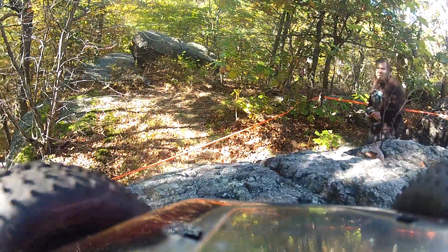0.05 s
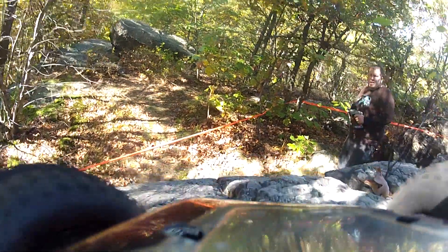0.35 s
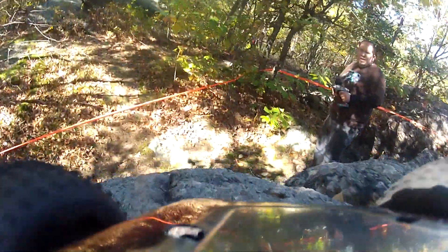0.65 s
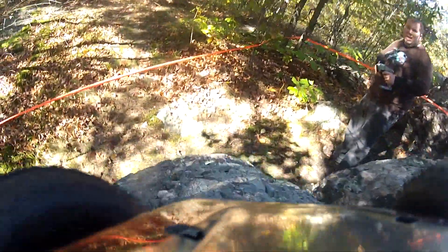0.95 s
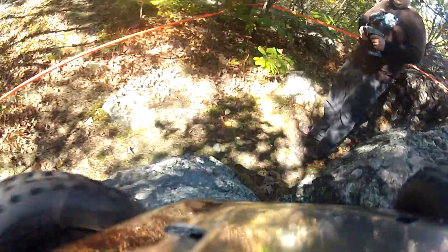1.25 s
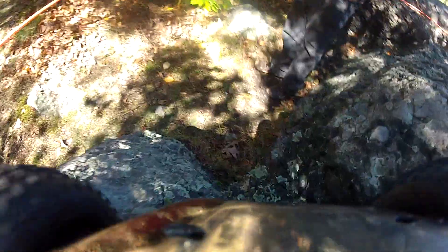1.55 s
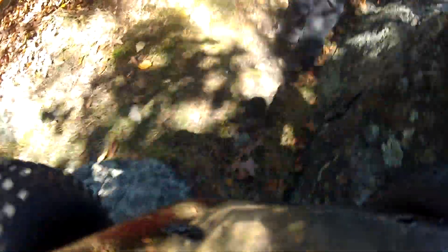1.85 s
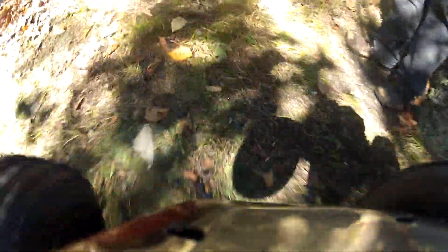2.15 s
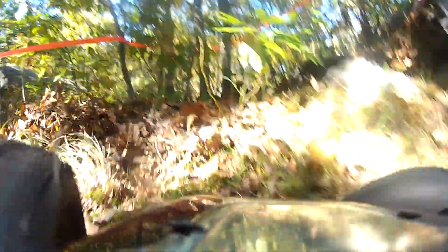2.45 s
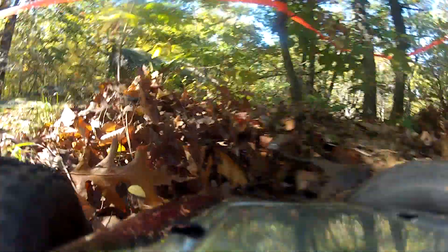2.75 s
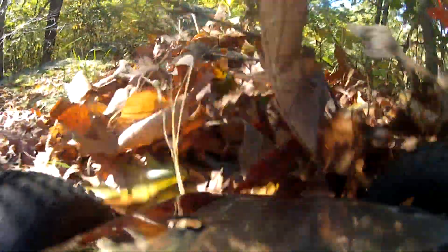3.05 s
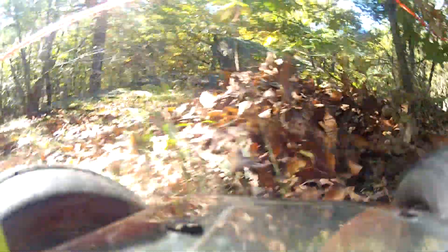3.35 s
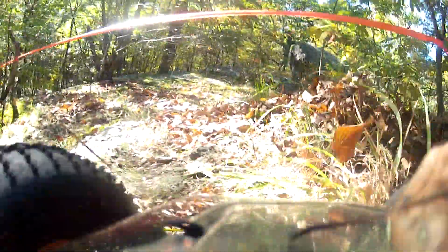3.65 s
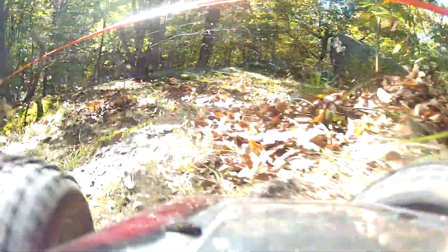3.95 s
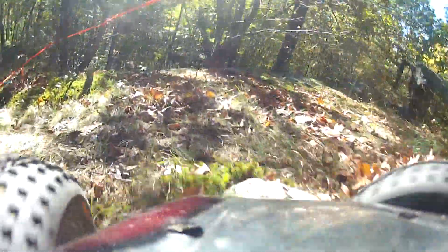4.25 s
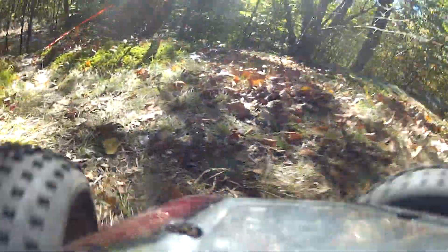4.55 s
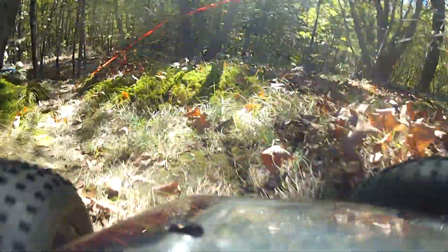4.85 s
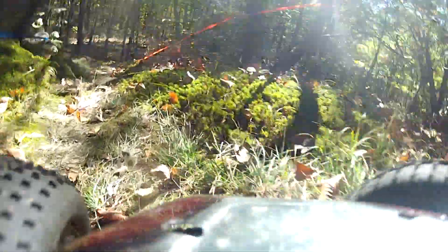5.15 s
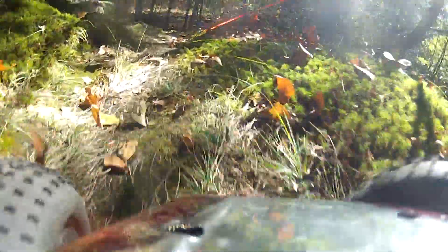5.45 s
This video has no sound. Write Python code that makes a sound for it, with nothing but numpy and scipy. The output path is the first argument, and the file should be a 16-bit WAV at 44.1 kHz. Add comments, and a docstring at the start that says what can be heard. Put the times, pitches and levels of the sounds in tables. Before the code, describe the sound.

A remote-controlled truck crawls down a rock, its small electric motor whining and chugging while the gears rattle, tyres rumble and the shell knocks. Midway the motor races as the truck thumps onto the forest floor, crackling through dry leaves. It nearly stalls twice, with faint steering squeals and gear clatter, then chugs on over bumps. The microphone rides on the chassis, close, dry and gritty.

```python
"""A radio-controlled truck, heard from its own chassis, crawls down a rock: the motor pinion whines against
the spur gear, which binds about once a turn and chugs; loose teeth rattle, tyres rumble, the shell knocks.
Near 2.4 s it drops onto the forest floor with a thump and a crackle of dry leaves, the motor racing.
Near 3.0 s and 3.7 s it slows, the steering servo squeals and the gears clatter as it pushes on, chugging.
Throughout, the small camera holds each value it samples at 12 kHz, mirroring the whine into the treble."""
import sys
import numpy as np
from scipy import signal
from scipy.fft import rfft, irfft
from scipy.io import wavfile
from scipy.ndimage import uniform_filter1d

SR = 44100
rng = np.random.default_rng(int(sys.argv[2]) if len(sys.argv) > 2 else 0)


def persist_wave(psi):
    """Save psi, clipped to +-1, as 16-bit WAV."""
    counts = np.round(np.clip(psi, -1, 1) * 32767).astype(np.int16)
    wavfile.write(sys.argv[1], SR, np.atleast_2d(counts).T)


N = 246954
TIME = np.arange(N) / SR

# pitch of the whine, the rate at which pinion and spur teeth meet: t/s, f/Hz
TOOTH_RATE = [(0.0, 446), (0.031, 493), (0.069, 310), (0.156, 632), (0.23, 1019), (0.265, 1000.0),
              (0.324, 1354), (0.39, 1415), (0.46, 1223), (0.5, 1402), (0.746, 1468), (0.82, 1642),
              (0.896, 1627), (0.96, 1853), (1.05, 1842), (1.254, 1388), (1.68, 1445), (1.774, 1923),
              (1.88, 2063), (1.976, 1912), (2.05, 1250.0), (2.2, 2451), (2.23, 3246), (2.344, 4103),
              (2.464, 3648), (2.51, 4160), (2.57, 3840), (2.61, 3051), (2.65, 3708), (2.734, 3240),
              (2.76, 2693), (2.885, 2030), (2.954, 1814), (3.014, 671.5), (3.1, 727.5), (3.12, 1022),
              (3.15, 992), (3.27, 1531), (3.315, 1570), (3.37, 1820.0), (3.45, 1682), (3.55, 1859),
              (3.64, 1617), (3.726, 388.0), (3.785, 389.7), (3.81, 711), (3.84, 694.6), (3.895, 1836),
              (3.925, 1523), (4.01, 2282), (4.11, 2268), (4.26, 2022), (4.5, 1987), (4.65, 1836),
              (4.74, 1907), (4.79, 2307), (4.9, 2026), (5.03, 1811), (5.14, 1903), (5.2, 1594), (5.3, 1835),
              (5.4, 1534), (5.49, 1605), (5.6, 1954)]
# steady load on the gears: t/s, whine level/dB, rattle level/dB
GEAR_LOAD = [(0, -22.5, -18), (.075, -24.5, -22), (.12, -17, -21.5), (.28, -14.5, -29), (.39, -47, -26.5),
             (.58, -30.5, -26.5), (.65, -31, -20.5), (1.04, -32, -28.5), (1.12, -31, -21.5),
             (1.25, -51, -21), (1.68, -26.5, -19), (1.8, -25.5, -30), (1.91, -42, -19.5),
             (2.05, -26.5, -29.5), (2.35, -54, -16), (2.48, -59, -28.5), (2.6, -62, -21.5),
             (2.73, -19, -24), (2.78, -40, -23.5), (3.06, -41, -32.5), (3.09, -17, -25.5), (3.55, -22, -25),
             (3.64, -17.5, -26), (3.7, -45, -33.5), (3.79, -31.5, -22.5), (3.95, -23, -29),
             (4.09, -26.5, -22.5), (4.15, -35, -30.5), (4.25, -39, -20.5), (4.45, -36, -22.5),
             (4.9, -34, -25), (5.6, -27.5, -27)]
# hard pulling sharpens the tooth contact: t/s, overtone slope/(dB per octave)
TOOTH_BITE = [(0, -10.5), (.2, -4.5), (.5, -13.5), (.8, -14.5), (1.9, -15), (2.19, -7.5), (2.3, -5),
              (3.1, -13.5), (3.2, -10.5), (3.4, -13), (3.85, -9.5), (5.6, -11.5)]
# how strongly the housing radiates the whine: f/Hz, level/dB
WHINE_EQ = [(300, -31), (470, -7.5), (560, -21), (700, 9), (1050, 8), (1450, 10.5), (1900, 12.5),
            (2500, -4.5), (3100, 10.5), (3400, 1), (3700, 3.5), (4250, -10), (4750, -6.5), (5900, -20)]
# runs of evenly spaced binds: first t/s, last t/s, step/teeth, whine level/dB, rattle level/dB, sag depth
CHUG_RUNS = [(0.689, 0.861, 79, -21.5, -28, 0.013), (0.908, 0.997, 101, -16.5, -26, 0.0085),
             (1.053, 1.218, 74, -21.5, -36.5, 0.017), (1.277, 1.651, 83.5, -19.5, -33.5, .015),
             (1.709, 1.981, 87.7, -19, -51, 0.016), (2.232, 2.682, 170, -34.5, -25, 0.069),
             (2.886, 2.931, 88, -15, -28, .05), (3.387, 3.485, 110, -25.5, -36, 0.019),
             (4.023, 4.099, 85, -49, -34, 0.056), (4.344, 4.723, 96.6, -17.5, -36.5, 0.087),
             (4.991, 5.054, 110, -16, -41, .09), (5.131, 5.176, 74, -15.5, -53, 0.087),
             (5.239, 5.29, 75, -23.5, -36, .02), (5.458, 5.582, 74.5, -20.5, -24, 0.029)]
# single hard binds as a wheel catches: t/s, half length/s, whine level/dB, rattle level/dB
WHEEL_CATCHES = [(.018, .014, -17, -43), (0.351, 0.028, -19.5, -54), (0.432, 0.017, -13.5, -47),
                 (0.512, 0.012, -16.5, -34), (0.739, 0.0094, -49, -27), (2.024, 0.021, -24, -30),
                 (2.097, 0.0095, -15, -58), (2.184, 0.048, -29.5, -25), (2.247, 0.019, -20.5, -43),
                 (2.434, 0.015, -12, -57), (2.596, 0.025, -16, -54), (2.967, 0.011, -41, -24),
                 (3.101, 0.021, -25.5, -49), (3.282, 0.015, -25.5, -45), (3.431, .014, -26.5, -44),
                 (3.6, .024, -25, -27.5), (3.802, 0.0092, -12, -49), (3.838, 0.01, -15, -19),
                 (3.882, 0.016, -13.5, -55), (3.94, 0.0098, -27, -50), (4.227, 0.018, -25, -30),
                 (4.335, 0.013, -22, -19.5), (4.46, 0.018, -27, -34), (4.836, .016, -22, -22),
                 (4.948, 0.02, -23, -19.5), (5.319, 0.012, -17.5, -28), (5.38, .014, -16, -32)]
# the throttle opens from rest and the backlash clatters: t/s, rattle level/dB
THROTTLE_KICKS = [(3.071, -11.5), (3.786, -13)]
# colour of the gearbox and shell when struck: f/Hz, level/dB
BODY_EQ = [(200, -15.5), (450, -14.5), (620, -11.5), (880, -3.5), (1100, 2), (1500, -8), (1850, 0),
           (2350, -11), (2750, -20.5), (3100, -8.5), (3400, -20), (3700, -9.5), (4250, -31), (5900, -32)]
# modes of the gearbox housing that ring on: f/Hz, width/Hz, level/dB
HOUSING_MODES = [(995, 42, -7), (1204, 150, -2), (1550, 30, -16), (1915, 24, -0.5), (2964, 53, 2.5),
                 (3550, 60, 2.5)]
# hoots of the housing: t/s, half length/s, f/Hz, level/dB
HOOT_CUES = [(0.026, .01, 990, -11.5), (0.569, 0.0063, 1060, -14.5), (0.682, 0.011, 1084, -14),
             (0.739, 0.0077, 1090, -9), (1.226, 0.01, 1008, -13), (1.275, 0.0088, 1074, -11.5),
             (2.233, 0.0011, 3260, -1.5), (2.4, 0.0086, 1243, -12.5), (2.658, 0.0061, 980, -14.5),
             (2.679, 0.0072, 1054, -9), (2.718, 0.014, 1065, -14.5), (2.824, 0.01, 1113, -16.5),
             (4.106, 0.0061, 1152, -5.5), (4.514, 0.0081, 1000, -11), (4.848, 0.0029, 1032, -3.5),
             (4.968, 0.0068, 995, -15.5)]
# knocks on the shell and chassis: t/s, peak level/dB, treble lift/dB
KNOCK_CUES = [(0.503, -17.5, 22), (0.604, -19, -8), (.777, -15, -7), (1.041, -37, -6), (1.441, -28, 6),
              (1.461, -17, 11), (1.482, -29, -10), (1.843, -16.5, -9), (1.924, -5, -19), (1.96, -7.5, 6),
              (2.091, -10.5, -10), (2.155, -12, 17), (2.431, -19, 5), (2.493, -10.5, -16),
              (2.559, -4.5, 10), (2.866, -6.5, 2), (3.018, -15, -6), (3.662, -8, -20), (3.682, -15, 6),
              (4.016, -12.5, -21), (4.322, -12, -2), (4.384, -10, -18), (4.834, -7.5, 7), (4.847, -19, 6),
              (4.926, -5, -18), (5.102, -13.5, -21), (5.317, -7, 8.5)]
# rumble of the tyres on the ground: t/s, level/dB
ROLL_FADER = [(0.0, -37), (0.37, -45), (1.39, -30.5), (1.87, -38), (1.9, -26), (2.06, -36.5), (2.17, -23.5),
              (2.21, -30.5), (2.34, -30), (2.37, -17.5), (2.48, -36), (2.59, -23), (2.7, -35),
              (3.07, -29.5), (3.4, -39.5), (3.81, -29), (3.94, -43), (3.99, -31.5), (4.18, -38.5),
              (4.21, -28), (4.66, -37.5), (4.85, -21.5), (4.88, -37), (4.96, -30), (5.02, -41), (5.46, -41),
              (5.6, -26.5)]
# colour of the tyres and suspension: f/Hz, level/dB
TYRE_EQ = [(20, -31), (45, -16.5), (70, -3), (94, 2), (120, -9), (150, -8.5), (200, -15), (330, -25.5),
           (600, -24), (1500, -46.5)]
# the wheels land: t/s, level/dB
LANDINGS = [(0.831, -16), (1.128, -15.5), (1.336, -14), (1.903, -12), (1.925, -12), (2.147, -10),
            (2.351, -22), (2.366, -4), (2.548, -13.5), (3.088, -15), (3.78, -16), (4.218, -15),
            (4.296, -12), (4.835, -10), (4.948, -18)]
# dry leaves under the wheels: t/s, level/dB
LEAF_FADER = [(0, -70), (2.3, -23), (2.5, -27), (2.9, -34), (3.05, -69), (3.7, -59), (4.3, -71), (5.6, -53)]
# colour of a snapping leaf: f/Hz, level/dB
LEAF_EQ = [(300, -18), (620, -2), (1200, 17), (3600, 0), (4500, -76), (6000, -15)]
# steering moves: start t/s, length/s, top f/Hz, level/dB
SERVO_CUES = [(3.028, 0.0744, 4170, -36), (3.734, 0.05, 4420, -41.5)]
# the slower gear stages: multiple of the tooth rate, level/dB
SLOW_STAGES = [(.229, -44), (.4, -45)]
# how the chassis plate carries their hum: f/Hz, level/dB
PLATE_EQ = [(280, -20), (400, -3), (470, 0), (580, 0), (700, -7), (1000, -20)]
# how firmly they press on the plate: t/s, level/dB
PLATE_PRESSURE = [(0, -47), (.5, 0), (1.85, 5), (2.0, -9), (3.2, 3), (3.35, 6.5), (3.65, 4.5), (3.8, -3),
                  (5.6, -2)]

PINION_TEETH = 20


def whine(mesh_hz, teeth, slack, slope_db, rough_db=2.5, runout=0.0069, wobble=0.18):
    """Harmonics of the tooth rate glide through the body's resonances; the pinion wobbles once a turn."""
    orders = np.arange(1, 6)[:, None]
    gains = gain_at(WHINE_EQ, orders * mesh_hz) * from_db(slope_db * np.log2(orders))
    gains /= np.sqrt(np.sum(gains ** 2, axis=0) / 2)
    rotor = np.sin(2 * np.pi * teeth / PINION_TEETH)
    # slack teeth meet early or late, more so at speed, which frays the overtones most
    stray = (.022 + .13 * slack) * np.minimum(mesh_hz / 1700, 1.2) * drift(110)
    cycles = teeth + stray + runout * slack * rotor
    tone = np.sum(gains * np.sin(2 * np.pi * orders * cycles), axis=0)
    return tone * (1 + wobble * rotor) * from_db(rough_db * drift(61))


def rattle(teeth, bright_db, uneven_db=4.0, rotor_db=1.5, limp=0.13):
    """Teeth slap both ways across their backlash, unevenly; at times every second tooth hits harder."""
    contacts = np.flatnonzero(np.diff(np.floor(2 * teeth)) > 0)
    force = (rng.standard_normal(N) * from_db(uneven_db * drift(375)))[:len(contacts)]
    force += limp * drift(37)[contacts] * np.cos(np.pi * teeth[contacts])
    rotor = np.sin(2 * np.pi * teeth[contacts] / PINION_TEETH)
    slaps = np.zeros(N)
    slaps[contacts] = force * from_db(rotor_db * rotor)
    return levelled(brighten(ring_body(slaps), bright_db), seconds=0.019)


def binds(mesh_hz, half_share=0.32, spread_db=2, catch_sag=0.055):
    """Cue list of every bind: they come at steps of the rotation, so faster gears chug faster."""
    teeth = np.cumsum(mesh_hz) / SR
    cues = [(*catch, catch_sag) for catch in WHEEL_CATCHES]
    for first, last, step, whine_db, rattle_db, sag in CHUG_RUNS:
        begin, end = np.interp([first, last], TIME, teeth)
        binding_teeth = np.linspace(begin, end, round((end - begin) / step) + 1)
        times = np.interp(binding_teeth, teeth, TIME)
        for s, chance_db in zip(times, spread_db * rng.standard_normal((32, 2))):
            half = half_share * step / np.interp(s, TIME, mesh_hz)
            cues.append((s, half, whine_db + chance_db[0], rattle_db + chance_db[1], sag))
    return cues


def gear_load(mesh_hz, build=1.42, release=0.8, drag=1.6, dulling=0.058):
    """Envelopes for the gears: the steady load plus a swell that builds at each bind and lets go."""
    whine_db, rattle_db = in_time(GEAR_LOAD)
    bite_db, = in_time(TOOTH_BITE)
    whine_gain, rattle_gain = from_db(whine_db), from_db(rattle_db)
    speed, duck_db = np.ones(N), np.zeros(N)
    # the rattle brightens with speed and with sharper contact
    bright_db = 2 + 3 * np.log2(mesh_hz / mesh_hz.mean()) + 0.71 * (bite_db - bite_db.mean())
    for s, half, tone_db, noise_db, sag in binds(mesh_hz):
        near = slice(*np.searchsorted(TIME, [s - .12, s + .12]))
        progress = (TIME[near] - s) / half  # in half lengths, as are build, release and drag
        lag = progress - (build - release) / 2  # the swell peaks late in the bind
        swell = np.exp(-(lag / np.where(lag < 0, build, release)) ** 2)
        whine_gain[near] += from_db(tone_db) * swell
        rattle_gain[near] += from_db(noise_db) * swell
        bite_db[near] += 4.5 * swell
        duck_db[near] -= 2.5 * np.exp(-((lag - 1.255) / 0.59) ** 2)  # the gears run free just after
        speed[near] -= sag * progress * np.exp(-(progress / drag) ** 2)  # dragged down, then recovering
    kick = (1 - np.exp(-TIME / 0.0075)) * np.exp(-TIME / 0.029)  # fast attack, short tail
    for s, kick_db in THROTTLE_KICKS:
        add(rattle_gain, s, from_db(kick_db) * kick)
    bright_db -= dulling * (20 * np.log10(rattle_gain) - rattle_db)  # a bind shakes mainly the low modes
    duck = from_db(duck_db)
    return whine_gain * duck, rattle_gain * duck, bright_db, bite_db, speed


def ring_body(hits):
    """Hits take on the colour of gearbox and shell, and the housing's modes ring on after each one."""
    struck = through(hits, BODY_EQ)
    out = struck.copy()
    for hz, width_hz, db in HOUSING_MODES:
        radius = np.exp(-np.pi * width_hz / SR)
        feed = np.array([1, 0, -1]) * (1 - radius ** 2) / 2
        feedback = [1, -2 * radius * np.cos(2 * np.pi * hz / SR), radius ** 2]
        out += from_db(db) * signal.lfilter(feed, feedback, struck + 1e-18)
    return out


def hoots(third_db=-20, sag=0.024):
    """The bouncing gear locks onto one housing mode, which swells briefly and sags as the gear slows."""
    out = np.zeros(N)
    for s, half, hz, db in HOOT_CUES:
        t = np.arange(-3 * half, 3 * half, 1 / SR)
        phase = 2 * np.pi * (hz * t * (1 - sag * t / half / 2) + rng.random())
        tone = np.sin(phase) + from_db(third_db) * np.sin(3 * phase)
        add(out, s + t[0], from_db(db) * np.exp(-(t / half) ** 2) * tone)
    return out


def knocks(chatter=0.6, chatter_s=0.0048, size=2048):
    """A sharp blow and a brief chatter ring the shell."""
    out = np.zeros(N)
    for s, peak_db, bright_db in KNOCK_CUES:
        blow = chatter * rng.standard_normal(size) * np.exp(-TIME[:size] / chatter_s)
        blow[8] += 1  # the click of the attack
        knock = brighten(ring_body(blow), bright_db)
        add(out, s, from_db(peak_db) * knock / np.abs(knock).max())
    return out


def tyres(trim_db=1.7, bounce_hz=84, bounce_s=0.011, low_cut_hz=30, size=6000):
    """Knobbly tyres rumble; each landing is a damped bounce of the chassis."""
    roll_db, = in_time(ROLL_FADER)
    rumble = levelled(through(rng.standard_normal(N), TYRE_EQ), seconds=0.097)
    out = from_db(roll_db + trim_db) * rumble
    bounce = np.sin(2 * np.pi * bounce_hz * TIME[:size]) * np.exp(-TIME[:size] / bounce_s)
    bounce = signal.sosfilt(signal.butter(1, low_cut_hz, "high", fs=SR, output="sos"), bounce)
    for s, db in LANDINGS:
        add(out, s, from_db(db) * bounce)
    return out


def leaves(per_s=600, clump_db=5, spread_db=6.0):
    """Dry leaves snap under the wheels in clumps, a few snaps far louder than the rest."""
    db, = in_time(LEAF_FADER)
    density = per_s * from_db(clump_db * drift(15))
    snaps = (rng.random(N) < density / SR) * rng.choice([-1, 1], N)
    force = from_db(spread_db * np.minimum(rng.exponential(1, N), 4))
    return from_db(db) * rms_one(through(snaps * force, LEAF_EQ))


def servo(bend=0.091, unsteady=0.0089):
    """The servo's thin, wavering squeal rises and falls in pitch and level with each steering move."""
    out = np.zeros(N)
    waver = 1 + unsteady * drift(221)
    for s, length, hz, db in SERVO_CUES:
        arch = np.sin(np.linspace(0, np.pi, int(length * SR)))
        pitch = hz * (1 - bend * (1 - arch)) * waver[:len(arch)]
        add(out, s, from_db(db) * arch * np.sin(2 * np.pi * np.cumsum(pitch) / SR))
    return out


def gearbox_hum(mesh_hz):
    """The slower gear stages hum faintly through the chassis plate, steadied by the truck's mass."""
    steady_hz = uniform_filter1d(mesh_hz, size=3000)
    teeth = np.cumsum(steady_hz) / SR
    press_db, = in_time(PLATE_PRESSURE)
    out = np.zeros(N)
    for ratio, db in SLOW_STAGES:
        gain = from_db(db + press_db) * gain_at(PLATE_EQ, ratio * steady_hz)
        out += gain * np.sin(2 * np.pi * ratio * teeth)
    return out


def from_db(db):
    """Decibels to gain."""
    return 10 ** (np.asarray(db) / 20)


def rms_one(x):
    """Scale to unit rms."""
    return x / np.sqrt(np.mean(x ** 2) + 1e-20)


def in_time(rows):
    """Each column of an automation curve at every sample."""
    s, *columns = np.transpose(rows)
    return [np.interp(TIME, s, column) for column in columns]


def gain_at(eq, hz):
    """Read an EQ curve's gain on a log-frequency axis."""
    points, db = np.transpose(eq)
    return from_db(np.interp(np.log(np.maximum(hz, 1)), np.log(points), db))


def drift(rate_hz):
    """Smooth random wander of unit rms."""
    hz = np.arange(N // 2 + 1) * SR / N
    return rms_one(irfft(rfft(rng.standard_normal(N)) / (1 + (hz / rate_hz) ** 2), N))


def through(x, eq, size=8192):
    """Ring x through a body with this EQ curve; minimum phase, so nothing sounds early."""
    hz = np.arange(size // 2 + 1) * SR / size
    cepstrum = irfft(np.log(gain_at(eq, hz)))
    cepstrum[1:size // 2] *= 2
    cepstrum[size // 2 + 1:] = 0
    impulse = irfft(np.exp(rfft(cepstrum)))
    return signal.fftconvolve(x, impulse)[:len(x)]


def levelled(x, seconds):
    """Ride the level to unit rms over stretches of this length; quicker grain is kept."""
    size = max(int(seconds * SR), 8)
    power = uniform_filter1d(uniform_filter1d(x ** 2, size), size)
    return x / np.sqrt(np.abs(power) + 1e-12)


def brighten(x, db, edge_hz=2500):
    """Treble shelf: harder contacts put more into the upper modes."""
    top = signal.sosfiltfilt(signal.butter(4, edge_hz, "high", fs=SR, output="sos"), x)
    return x + (from_db(db) - 1) * top


def add(track, s, sound):
    """Mix a sound into a track at time s."""
    start = int(np.clip(s * SR, 0, N - 1))
    track[start:start + len(sound)] += sound[:N - start]


def scene():
    """Everything reaches the one microphone through the chassis, close and dry."""
    mesh_hz, = in_time(TOOTH_RATE)
    whine_gain, rattle_gain, bright_db, bite_db, speed = gear_load(mesh_hz)
    mesh_hz = uniform_filter1d(mesh_hz * speed, size=400)  # rotor inertia rounds each change of speed
    teeth = np.cumsum(mesh_hz) / SR
    slack = rattle_gain / (rattle_gain + whine_gain)
    gears = from_db(-0.06) * whine_gain * whine(mesh_hz, teeth, slack, bite_db)
    gears += from_db(-0.28) * rattle_gain * rattle(teeth, bright_db)
    truck = gears + hoots() + knocks() + tyres() + servo() + leaves() + gearbox_hum(mesh_hz)
    return np.array([truck, truck])


def record(dry, hold_hz=12000, ceiling=0.82, cutoff_hz=15300):
    """The camera clips peaks and holds each sample: mirror tones rise on both sides of the hold rate."""
    coarse = signal.resample_poly(dry, hold_hz, SR, axis=1)
    held = np.repeat(np.clip(coarse, -ceiling, ceiling), 4, axis=1)
    gritty = signal.resample_poly(held, SR, 4 * hold_hz, axis=1)[:, :N]
    return signal.sosfilt(signal.ellip(10, .1, 80, cutoff_hz, fs=SR, output="sos"), gritty)


dry = scene()
out = record(dry)
persist_wave(out)
```